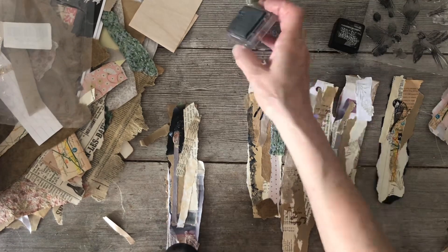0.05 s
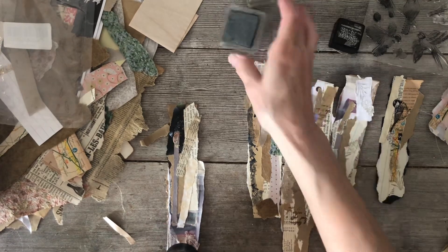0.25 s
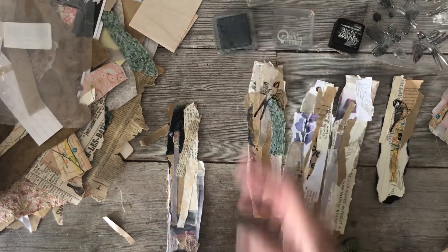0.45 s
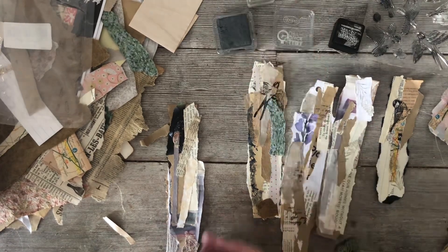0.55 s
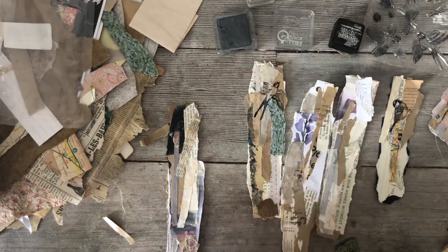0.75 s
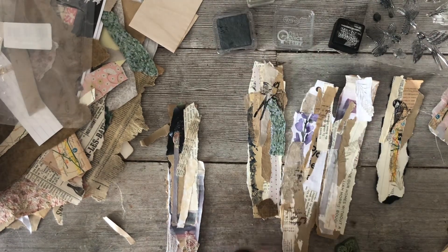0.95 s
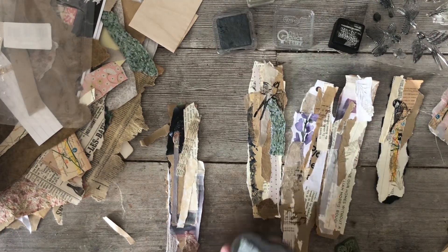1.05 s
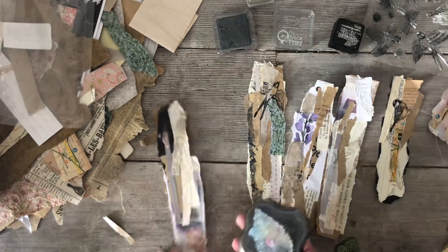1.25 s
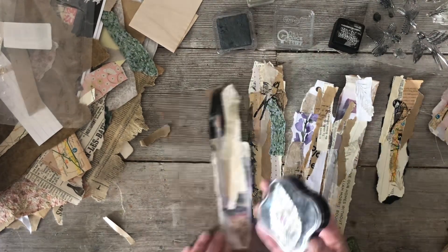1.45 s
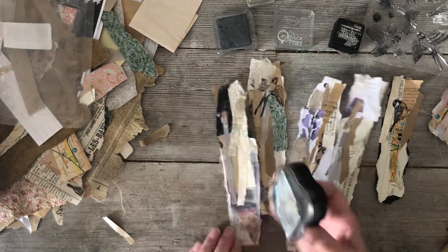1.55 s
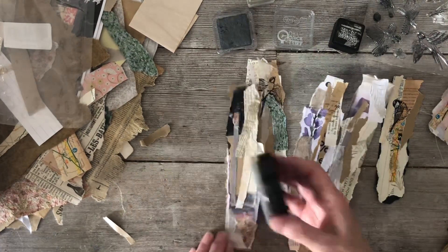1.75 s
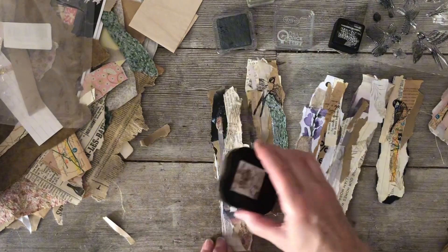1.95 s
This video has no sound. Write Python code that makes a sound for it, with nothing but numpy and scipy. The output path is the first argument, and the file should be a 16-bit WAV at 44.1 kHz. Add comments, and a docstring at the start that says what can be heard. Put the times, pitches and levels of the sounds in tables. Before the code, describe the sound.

A plastic ink pad is set down on a wooden desk with knocks, a lid snap and a sharp clack, then soft hand bumps and faint paper sliding, close microphone in a small quiet room.

```python
"""A plastic ink pad is put down on a wooden desk: it knocks, its lid snaps, the case clacks and rocks to rest.
Each contact rings damped modes under a short noise crack; the desk top booms as decaying low noise.
Hands then bump softly, tick, and slide a strip of paper: ringing modes, noise bursts and grainy swells.
A small room answers with a diffuse tail, over air noise and a faint wavering hum."""
import sys
import numpy as np
from scipy import signal
from scipy.fft import rfft, irfft, next_fast_len
from scipy.io import wavfile
from scipy.ndimage import map_coordinates

SR = 44100
rng = np.random.default_rng(int(sys.argv[2]) if len(sys.argv) > 2 else 0)


def store_pcm(level_fs):
    """Save levels as 16-bit WAV."""
    pcm = np.round(np.clip(level_fs, -1, 1) * 32767).astype(np.int16)
    wavfile.write(sys.argv[1], SR, np.atleast_2d(pcm).T)


N = 88200
EVENT_T_S = np.arange(SR // 2) / SR  # time axis of one event or room tail


def amp(db):
    """Decibels to gain."""
    return 10 ** (np.asarray(db) / 20)


def unit(x):
    """Scale to rms 1."""
    return x / np.sqrt(np.mean(x ** 2) + 1e-20)


def along(points, hz):
    """Interpolate (Hz, value) points on a log frequency axis."""
    point_hz, values = np.transpose(points)
    return np.interp(np.log(hz + 1), np.log(point_hz + 1), values)


def noise(colour, size, tilt_db_per_octave=0):
    """Coloured, tilted noise of rms 1."""
    hz = np.fft.rfftfreq(size, 1 / SR)
    gain_db = along(colour, hz) + tilt_db_per_octave * np.log2(hz + 1)
    spectrum = rfft(rng.standard_normal(size)) * amp(gain_db)
    return unit(irfft(spectrum, size))


def wobble(knots_per_s):
    """Smooth random curve through evenly spaced knots."""
    knots = rng.standard_normal(4096)
    return map_coordinates(knots, [np.arange(N) * knots_per_s / SR], mode="wrap")


def fade(t60_s):
    """Exponential decay by 60 dB in t60."""
    return np.exp(-np.log(1000) * EVENT_T_S / t60_s)


def build_up(time_s):
    """Exponential approach to full level."""
    return 1 - np.exp(-EVENT_T_S / time_s)


def high_pass(x, order, cut_hz):
    """Butterworth removal of the bass."""
    return signal.sosfilt(signal.butter(order, cut_hz, "highpass", fs=SR, output="sos"), x)


def ring(modes, pitch=1, tilt_db_per_octave=0, build_cycles=0.51):
    """Damped modes with an exponential build-up; a harder contact favours the high ones."""
    out = np.zeros(len(EVENT_T_S))
    for hz, db, t60_s in modes:
        level = amp(db + tilt_db_per_octave * np.log2(hz / modes[0][0]))
        envelope = fade(t60_s) * build_up(build_cycles / hz)
        out += level * envelope * np.sin(2 * np.pi * hz * pitch * EVENT_T_S)
    return out


def add(track, start_s, sound):
    """Mix a sound in at its start time."""
    i = max(0, round(start_s * SR))
    track[i:i + len(sound)] += sound[:N - i]


def strikes(rows, modes, crack, crack_db, crack_t60_s, low_hz, build_cycles):
    """Each contact rings the object's modes under a short crack; a small object radiates little bass."""
    out = np.zeros(N)
    for start_s, db, pitch, tilt in rows:
        body = ring(modes, pitch, tilt, build_cycles)
        crack_noise = fade(crack_t60_s) * noise(crack, len(EVENT_T_S), tilt)
        add(out, start_s, amp(db) * (body + amp(crack_db) * crack_noise))
    return high_pass(out, 3, low_hz)


def swells(rows, colour, grain_db, grain_knots_per_s):
    """Friction: grainy noise that swells and fades with each stroke."""
    t_s, out = np.arange(N) / SR, np.zeros(N)
    for peak_s, db, rise_s, fall_s, tilt in rows:
        side_s = np.where(t_s < peak_s, rise_s, fall_s)
        envelope = np.exp(-((t_s - peak_s) / side_s) ** 2)
        out += amp(db) * envelope * noise(colour, N, tilt)
    return out * unit(amp(grain_db * wobble(grain_knots_per_s)))


# Room noise spectrum. Each row: frequency in Hz, relative level in dB.
AIR_SPECTRUM = [(15, -35.5), (25, -4.5), (108, -6.5), (326, -19), (373, -22), (489, -9.5), (624, -18),
                (677, -14), (988, -19), (1190, -20), (2000, -25.5), (2760, -32.5), (16000, -41.5)]


def air(level_db=-66.5):
    """Stationary coloured room noise."""
    return amp(level_db) * noise(AIR_SPECTRUM, N)


# Resonances in the room's drone. Each row: centre in Hz, width in Hz, level in dB.
HUM_BANDS = [(64, 14, -75.5), (95, 5.3, -68), (285.7, 44, -75.5), (350, 40, -76), (481, 11, -80.5),
             (904, 8.3, -86.5)]


def hum(swell_db=1.0):
    """Low drone of narrow noise bands, wavering together in level."""
    out = np.zeros(N)
    for hz, width_hz, db in HUM_BANDS:
        band = [(max(hz - 4 * width_hz, 1), -45), (hz - width_hz, -13), (hz, 0),
                (hz + width_hz, -13), (hz + 4 * width_hz, -45), (hz * 4, -100)]
        out += amp(db) * noise(band, N)
    return out * amp(swell_db * wobble(6))


# Room decay. Each row: frequency in Hz, t60 in s.
ROOM_DECAY = [(100, .3), (500, 0.41), (1200, 0.26), (2000, .18), (6000, 0.2), (14000, .19)]


def room(x, level_db=-13, wall_delay_s=0.0093):
    """Diffuse answer of the walls: a noise tail that mostly dies sooner in the treble."""
    hz, t_s, cells = signal.stft(rng.standard_normal(len(EVENT_T_S)), SR, nperseg=256)
    decay = np.exp(-np.log(1000) * t_s / along(ROOM_DECAY, hz)[:, None])
    tail = signal.istft(cells * decay, SR, nperseg=256)[1][:len(EVENT_T_S)]
    tail = tail * (1 - np.exp(-(EVENT_T_S / wall_delay_s) ** 2))
    return amp(level_db) * signal.fftconvolve(x, tail / np.linalg.norm(tail))[:N]


# Forearm rubs. Each row: peak in s, level in dB, rise in s, fall in s, brightness in dB per octave.
ARM_RUBS = [(.92, -68, 0.087, 0.13, 4.5), (1.33, -65, 0.26, 0.15, 1), (1.56, -62.5, 0.13, 0.1, -2),
            (1.83, -63, 0.24, 0.21, -1)]
# Rub spectrum. Each row: frequency in Hz, relative level in dB.
RUB_SPECTRUM = [(50, -6.5), (70, 8.5), (130, -23.5), (300, 2), (550, -7.5), (900, -15), (2000, -22.5),
                (5000, -52)]


def arm_rubs():
    """Low friction noise of the forearm along the desk."""
    return swells(ARM_RUBS, RUB_SPECTRUM, grain_db=3.5, grain_knots_per_s=79)


# Paper strokes. Each row: peak in s, level in dB, rise in s, fall in s, brightness in dB per octave.
PAPER_STROKES = [(.68, -70, 0.026, 0.028, -0.5), (.808, -70, 0.019, 0.012, 3), (.94, -69, .06, 0.17, -5.5),
                 (1.18, -69, 0.14, 0.048, -0.5), (1.365, -56.5, 0.12, 0.14, 1),
                 (1.472, -51, 0.011, 0.013, 2), (1.5, -63, 0.05, 0.12, -1.5),
                 (1.725, -69.5, 0.048, 0.044, 2.5), (1.83, -66, 0.19, 0.12, -0.5)]
# Paper spectrum. Each row: frequency in Hz, relative level in dB.
PAPER_SPECTRUM = [(300, -22), (1200, -11), (2600, -7.5), (3800, 0.5), (4700, -1.5), (6000, -0.5),
                  (7400, -3), (9300, -6), (12000, -6), (15500, -5)]


def paper_strokes():
    """Broad friction hiss of paper over the boards."""
    return swells(PAPER_STROKES, PAPER_SPECTRUM, grain_db=2, grain_knots_per_s=460)


# Paper edge drags. Each row: peak in s, level in dB, rise in s, fall in s, centre in Hz.
EDGE_WHISPERS = [(.895, -75, 0.049, 0.056, 3200), (1.35, -61.5, .11, .08, 5800),
                 (1.55, -76.5, 0.12, 0.28, 3993), (1.473, -58.5, 0.01, .015, 4020),
                 (1.72, -67.5, .03, .04, 13190), (1.87, -76, .05, 0.04, 8910)]


def paper_whispers(half_width_octaves=0.28, edge_db=-12, skirt_db=-45):
    """Narrow hiss peaks as the paper's edge drags."""
    out, ratio = np.zeros(N), 2 ** half_width_octaves
    for *stroke, hz in EDGE_WHISPERS:
        band = [(hz / ratio ** 3, skirt_db), (hz / ratio, edge_db), (hz, 0),
                (hz * ratio, edge_db), (hz * ratio ** 3, skirt_db)]
        out += swells([(*stroke, 0)], band, grain_db=3.5, grain_knots_per_s=380)
    return out


# Fingertip and paper ticks. Each row: start in s, level in dB, t60 in s, centre in Hz.
FINGER_TICKS = [(0.116, -54, 0.042, 13200), (0.166, -62, 0.12, 12800), (.1828, -48, .015, 7000),
                (.209, -52.5, .07, 13740), (0.357, -51, .015, 12000), (0.3961, -49.5, 0.019, 10800),
                (0.4239, -55, 0.019, 10850), (0.6486, -55, .016, 4390), (0.8462, -64, .012, 5500),
                (0.9182, -49.5, 0.011, 3580), (0.919, -52, 0.01, 9200), (1.1414, -45.5, 0.0032, 5000),
                (1.141, -55, .02, 1490), (1.25, -51.5, .012, 12140), (1.345, -48, .02, 5970),
                (1.596, -53.5, .012, 12030), (1.606, -62, .01, 11950), (1.701, -62, 0.013, 13990),
                (1.709, -62, 0.01, 14000), (1.922, -65.5, 0.0086, 13860)]


def ticks(half_width_octaves=0.8, skirt_db=-6, low_db=-22, high_db=-14):
    """Tiny clicks, each a briefly decaying band of noise."""
    out, ratio = np.zeros(N), 2 ** half_width_octaves
    for start_s, db, t60_s, hz in FINGER_TICKS:
        band = [(hz / ratio ** 3, low_db), (hz / ratio, skirt_db), (hz, 0),
                (hz * ratio, skirt_db), (hz * ratio ** 2, high_db)]
        add(out, start_s, amp(db) * fade(t60_s) * noise(band, len(EVENT_T_S)))
    return out


# Soft hand bumps. Each row: start in s, level in dB, pitch factor.
HAND_BUMPS = [(.232, -43.5, 0.69), (.398, -45.5, 0.84), (0.843, -54.5, 0.97), (0.899, -46, 1.02),
              (.932, -60, 1), (1.034, -58, 1.072), (1.121, -44.5, 1.07), (1.133, -44.5, 0.56),
              (1.17, -53, 0.448)]
# Bump modes. Each row: frequency in Hz at pitch factor 1, relative level in dB, t60 in s.
HAND_BUMP_MODES = [(149.4, 0, 0.1), (260.4, 2, .06), (332, 0, .06)]


def hand_bumps(attack_s=0.0044):
    """The desk answers the hands dully: low modes with a softened attack."""
    out = np.zeros(N)
    for start_s, db, pitch in HAND_BUMPS:
        add(out, start_s, amp(db) * build_up(attack_s) * ring(HAND_BUMP_MODES, pitch))
    return out


# Desk booms. Each row: start in s, level in dB, t60 in s.
DESK_THUDS = [(.005, -44.5, 0.1), (.028, -45.5, .12), (.148, -42, 0.24), (0.181, -47.5, 0.16),
              (0.231, -38.5, 0.14), (0.297, -35, 0.15), (.353, -58, 0.17), (0.396, -48, .13)]
# Desk top spectrum. Each row: frequency in Hz, relative level in dB.
DESK_SPECTRUM = [(30, -47), (70, -17.5), (110, -9.5), (160, 4), (230, 0.5), (330, 0), (490, 0.5),
                 (650, -10.5), (1100, -11), (2000, -27.5), (5000, -60)]


def desk_thuds(attack_s=0.009):
    """The desk top booms under the pad: decaying low noise."""
    out = np.zeros(N)
    for start_s, db, t60_s in DESK_THUDS:
        boom = fade(t60_s) * build_up(attack_s) * noise(DESK_SPECTRUM, len(EVENT_T_S))
        add(out, start_s, amp(db) * boom)
    return out


# Pad scuffs. Each row: peak in s, level in dB, rise in s, fall in s, brightness in dB per octave.
PAD_SCUFFS = [(.02, -45, .03, .022, 0), (.066, -58.5, .01, 0.029, 1), (.112, -64.5, .012, .02, 9.5),
              (.143, -57, .008, 0.0047, -0.5), (.158, -47.5, .006, .03, -4.5),
              (.214, -42.5, .007, .014, -0.5), (.262, -53, .012, .02, 0.5), (.292, -40.5, .008, .008, -5),
              (.366, -39, 0.0024, 0.0029, -5.5), (.4, -45, 0.021, .016, -2.5)]
# Scuff spectrum. Each row: frequency in Hz, relative level in dB.
SCUFF_SPECTRUM = [(60, -33), (200, -1.5), (600, -4.5), (1200, -0.5), (2500, -1.5), (3600, -10), (5500, -20),
                  (7000, -22), (15000, -27)]


def pad_scuffs():
    """Friction of the pad between fingers and boards."""
    return swells(PAD_SCUFFS, SCUFF_SPECTRUM, grain_db=0.5, grain_knots_per_s=240)


# Edges on the boards. Each row: start in s, level in dB, pitch factor, brightness in dB per octave.
EDGE_KNOCKS = [(.002, -39, 1.4, -0.5), (.011, -38, 1, 1.5), (.028, -41, 1.11, 1.5), (.0573, -37, 1.6, -1),
               (.1474, -27, 1.02, -2), (.1825, -34.5, 0.75, 0.5), (.2026, -35.5, 1.4, 1.5),
               (.2215, -45, 2.61, -2.5), (.3528, -28.5, .95, -3.5), (.3972, -36, 0.93, -4)]
# Board modes. Each row: frequency in Hz at pitch factor 1, relative level in dB, t60 in s.
BOARD_MODES = [(490, -14, .08), (740, -18, .04), (940, -14, .04), (1100, -9, .035), (1340, -2, .022),
               (1560, -7, .015), (1900, -6, .015)]
# Board crack spectrum. Each row: frequency in Hz, relative level in dB.
BOARD_CRACK_SPECTRUM = [(200, -12.5), (800, 2), (1400, 7.5), (2400, 1), (3500, -12.5), (5000, -16.5),
                        (7000, -23), (15000, -32.5)]


def board_knocks():
    """Edges knock the boards into short, woody modes."""
    return strikes(EDGE_KNOCKS, BOARD_MODES, BOARD_CRACK_SPECTRUM,
                   crack_db=-4, crack_t60_s=0.016, low_hz=398, build_cycles=0.067)


# Lid snaps and chatter. Each row: start in s, level in dB, pitch factor, brightness in dB per octave.
LID_SNAPS = [(.001, -28.5, .95, -14), (.009, -38.5, 0.93, -13), (.026, -42.5, 0.86, -4),
             (.2083, -37.5, 0.98, -10.5), (.2297, -21, 0.98, -2), (.2816, -41, 0.6, -4)]
# Lid modes. Each row: frequency in Hz at pitch factor 1, relative level in dB, t60 in s.
LID_MODES = [(2153, -6.5, 0.073), (2730, -6.5, 0.078), (4200, -14, .06), (4470, -18.5, 0.092),
             (5240, 6, 0.0094), (5530, 2.5, .01), (6066, -8.5, 0.017), (9200, -9, .016),
             (9650, -14.5, 0.06)]
# Lid crack spectrum. Each row: frequency in Hz, relative level in dB.
LID_CRACK_SPECTRUM = [(300, -17), (1200, -8), (2500, 1.5), (3600, -10.5), (4600, -12.5), (5300, -0.5),
                      (7500, -7), (10000, -9.5), (15500, -16)]


def lid_snaps():
    """The lid snaps and chatters, its modes building up over a few cycles."""
    return strikes(LID_SNAPS, LID_MODES, LID_CRACK_SPECTRUM,
                   crack_db=-9.5, crack_t60_s=0.04, low_hz=1130, build_cycles=2.5)


# Crack spectrum of case and rim. Each row: frequency in Hz, relative level in dB.
CASE_CRACK_SPECTRUM = [(200, -30.5), (900, -24), (1500, 0.5), (2200, 7.5), (2900, -13.5), (4000, -3),
                       (5800, -5), (6600, -14.5), (8800, -9), (10000, -26), (11300, -12.5), (12500, -22.5),
                       (15500, -13.5)]
# Drops onto the rim. Each row: start in s, level in dB, pitch factor, brightness in dB per octave.
RIM_DROPS = [(.3523, -20, 1.005, -5), (.3548, -26, 0.74, -4.5), (.3851, -26.5, 1.02, -5)]
# Rim modes. Each row: frequency in Hz at pitch factor 1, relative level in dB, t60 in s.
RIM_MODES = [(1390, -2, .026), (1940, 0, .028), (2730, -9, .018), (3600, -14, .012), (4860, -8, .022)]


def rim_taps():
    """The pad drops back onto its rim and rings the rim's modes."""
    return strikes(RIM_DROPS, RIM_MODES, CASE_CRACK_SPECTRUM,
                   crack_db=-11.5, crack_t60_s=0.036, low_hz=900, build_cycles=1.0)


# Case on desk. Each row: start in s, level in dB, pitch factor, brightness in dB per octave.
CASE_CLACKS = [(.29705, -6.5, 0.99, -1.5), (.30162, -8.5, 0.96, -2.5), (.30315, -14, 1, -2.5),
               (.3143, -31, 0.65, -1.5), (.3316, -21.5, 1.01, -4)]
# Case modes. Each row: frequency in Hz at pitch factor 1, relative level in dB, t60 in s.
CASE_MODES = [(1487, -14, .035), (1750, -14.5, .04), (1957.6, 1.5, 0.013), (2050, -13.5, .075),
              (2079, -13, 0.097), (2238, -16, 0.01), (3610, -6.5, 0.015), (4050, -4.5, 0.0075),
              (4430, -13.5, .022), (4980, -16.5, .018), (5730, -16, 0.014), (7302, -20.5, .014),
              (8980, -17.5, 0.0099), (11100, -26, 0.0081)]


def case_clacks():
    """The case hits the desk and rings its plastic modes."""
    return strikes(CASE_CLACKS, CASE_MODES, CASE_CRACK_SPECTRUM,
                   crack_db=-11.5, crack_t60_s=0.021, low_hz=1350, build_cycles=0.87)


def scene():
    """All the sounds at the desk, in the room."""
    ink_pad = case_clacks() + rim_taps() + lid_snaps() + board_knocks() + pad_scuffs()
    desk = desk_thuds() + hand_bumps()
    sliding = paper_strokes() + paper_whispers() + arm_rubs()
    near = ink_pad + desk + ticks() + sliding
    return (near + room(near) + hum() + air())[None]


def record(dry, low_cut_hz=42, top_hz=15900):
    """The microphone sheds the deepest bass; a steep low-pass sets the band limit."""
    size = next_fast_len(N + SR // 2)
    spectrum = rfft(high_pass(dry, 3, low_cut_hz), size)
    low_pass = 1 / (1 + (np.fft.rfftfreq(size, 1 / SR) / top_hz) ** 120)
    return irfft(spectrum * low_pass, size)[:, :N]


dry = scene()
out = record(dry)
store_pcm(out)
```